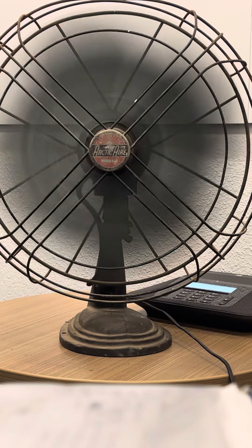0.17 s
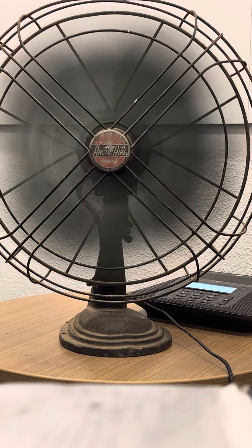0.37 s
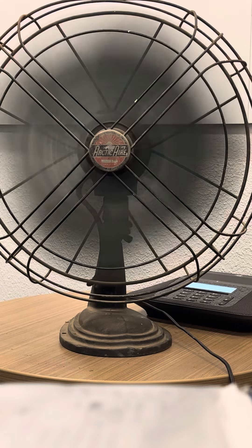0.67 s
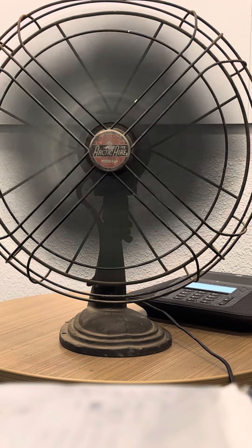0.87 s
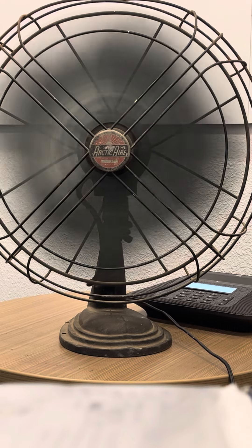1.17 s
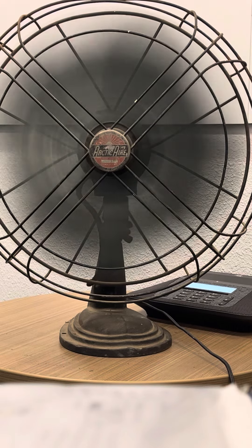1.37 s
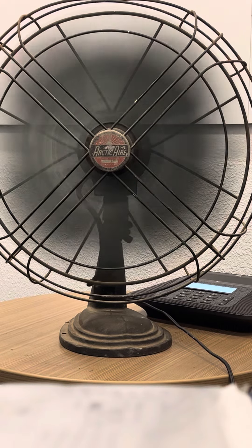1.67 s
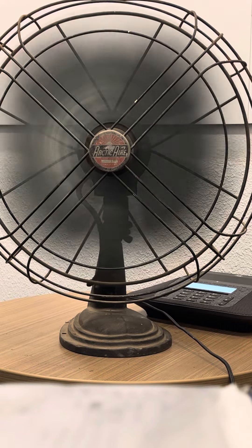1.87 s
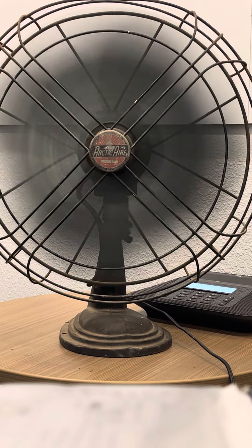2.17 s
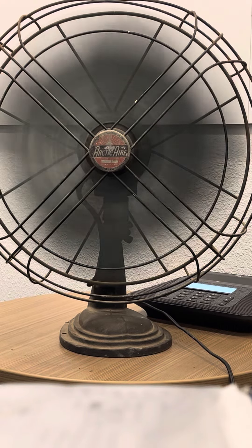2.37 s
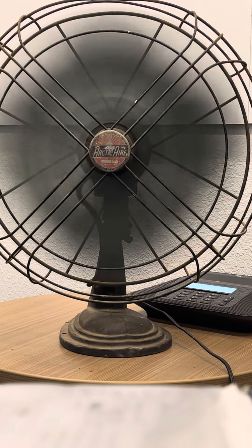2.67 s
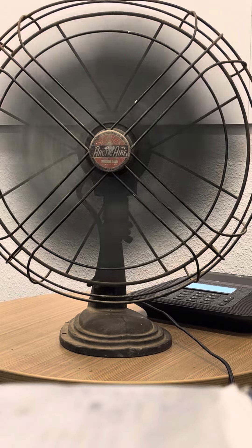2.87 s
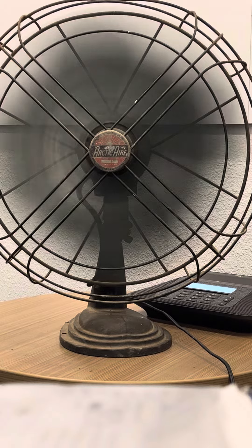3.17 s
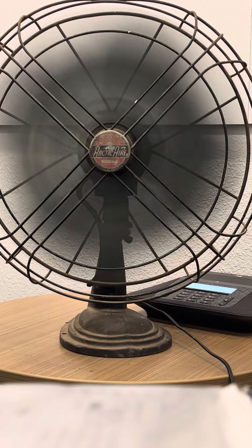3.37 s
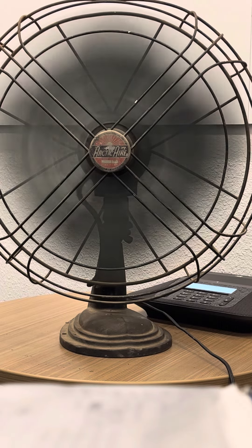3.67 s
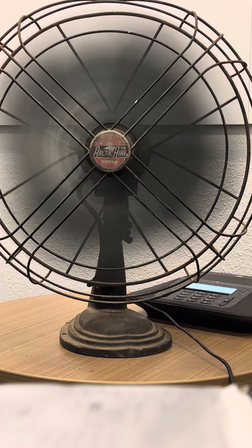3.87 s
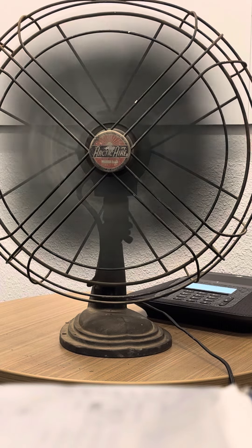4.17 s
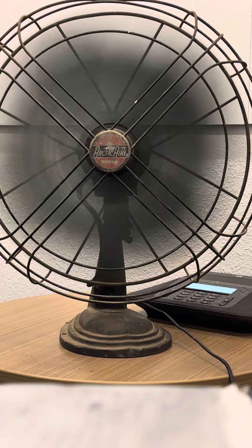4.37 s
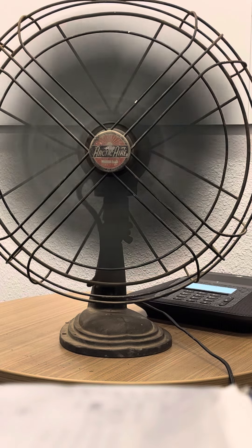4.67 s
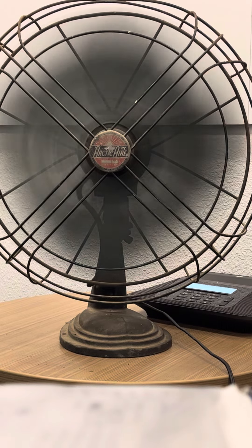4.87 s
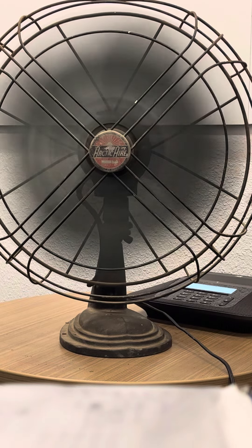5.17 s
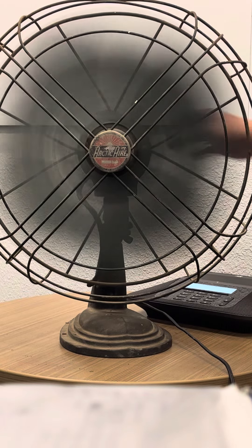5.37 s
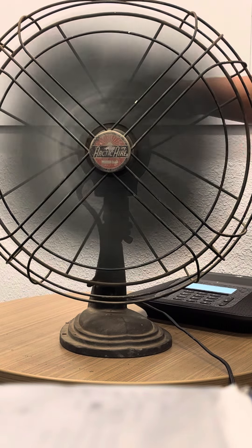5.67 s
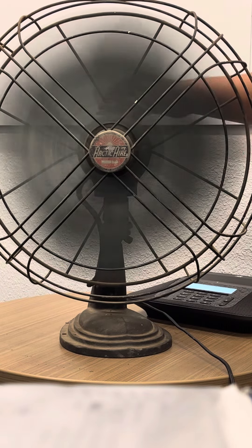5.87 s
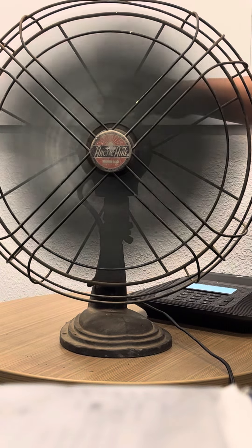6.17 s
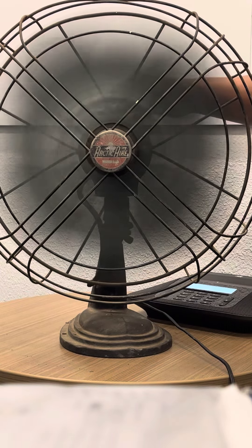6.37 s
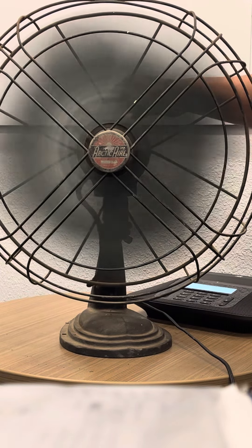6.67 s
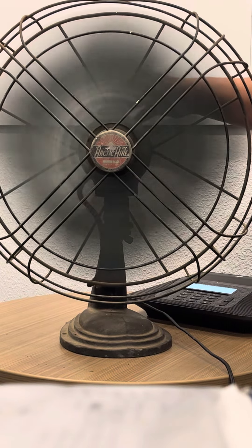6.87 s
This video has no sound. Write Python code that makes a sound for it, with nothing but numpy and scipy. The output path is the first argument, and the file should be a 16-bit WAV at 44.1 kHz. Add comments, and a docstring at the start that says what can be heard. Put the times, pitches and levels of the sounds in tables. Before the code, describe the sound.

Close wind buffeting from an old electric fan: bassy, lumpy gusts push against the microphone, irregular little flutters and dull pops crackle on top, and heavy thumps land now and then. A smooth, muted airy whoosh and weak low hum continue behind. A tiny dry tick passes past the middle, then pops crowd together before the steady turbulent blowing carries on. Small room, barely any echo.

```python
"""A desk fan blows straight at a nearby microphone in a small room: 7 s of even whoosh, hum and wind.
From the start, filtered noise makes blade whoosh and port rumble; small eddies flutter past in puffs.
Short pressure swings make pops from 0.4 s and thumps from 1.4 s, amid gusts and brief lulls.
A faint dry tick falls at 4.65 s; pops crowd between 5.4 and 5.7 s.
The turbulence and the whoosh grow slightly stronger towards the end."""
import sys
import numpy as np
from scipy import signal
from scipy.fft import rfft, irfft, next_fast_len
from scipy.io import wavfile
from scipy.ndimage import uniform_filter1d

SR = 44100
rng = np.random.default_rng(int(sys.argv[2]) if len(sys.argv) > 2 else 0)


def store_pcm(level_fs):
    """Save levels as 16-bit WAV."""
    pcm = np.round(np.clip(level_fs, -1, 1) * 32767).astype(np.int16)
    wavfile.write(sys.argv[1], SR, np.atleast_2d(pcm).T)


N = 309582
TIME = np.arange(N) / SR


def from_db(db):
    """Decibels to gain."""
    return 10 ** (np.asarray(db) / 20)


def rms_one(x):
    """Scale to rms 1."""
    return x / np.sqrt(np.mean(x ** 2) + 1e-20)


def in_time(points):
    """Interpolate a (start_s, value) table at every sample."""
    start_s, values = np.transpose(points)
    return np.interp(TIME, start_s, values)


def at_hz(points, hz):
    """Read a (frequency_hz, value) table on a log-frequency axis."""
    known_hz, values = np.transpose(points)
    return np.interp(np.log(np.maximum(hz, 1)), np.log(known_hz), values)


def filtered(x, response):
    """Pass x through a frequency response, given as a function of Hz."""
    size = next_fast_len(N + SR // 2)
    hz = np.arange(size // 2 + 1) * SR / size
    return irfft(rfft(x, size) * response(hz), size)[:N]


def noise(spectrum):
    """Gaussian noise with the given dB per Hz."""
    white = rng.standard_normal(N) * np.sqrt(SR / 2)   # 0 dB per Hz
    return filtered(white, lambda hz: from_db(at_hz(spectrum, hz)))


def drift(rate_hz):
    """Smooth random curve that changes about rate_hz times a second; rms 1."""
    return rms_one(filtered(rng.standard_normal(N), lambda hz: 1 / (1 + (hz / rate_hz) ** 2)))


def lumps(rate_hz):
    """Quick, bounded random swings of the flow without slow wander; rms 1."""
    swings = filtered(rng.standard_normal(N), lambda hz: hz / (rate_hz ** 2 + hz ** 2) / (rate_hz + hz))
    return rms_one(np.tanh(rms_one(swings)))


def evened(x, span_s):
    """Hold the rms near 1 over a short span and keep the faster detail."""
    width = max(int(span_s * SR), 2)
    power = uniform_filter1d(uniform_filter1d(x ** 2, width), width)
    return x / np.sqrt(np.abs(power) + 1e-4 * np.mean(x ** 2))


def swells(rows):
    """Envelope of bells (centre_s, level_db, width_s); overlapping powers add, width is sigma of power."""
    power = np.zeros(N)
    for centre_s, level_db, width_s in rows:
        first = max(int((centre_s - 6 * width_s) * SR), 0)
        last = max(int((centre_s + 6 * width_s) * SR), 0)
        near = slice(first, last)
        power[near] += from_db(level_db) ** 2 * np.exp(-.5 * ((TIME[near] - centre_s) / width_s) ** 2)
    return np.sqrt(power)


# rumble of the port: frequency_hz, density_db_per_hz (shape only: rms is evened)
RUMBLE_SPECTRUM = [(12, -48), (22, -26.5), (35, -12), (48, 2), (60, -0.5), (85, 0.5), (115, -9.5),
                   (160, -12.5), (230, -28.5), (400, -36), (900, -92)]


def rumble(level_db, gust_db, lumpy_db, lumps_per_s, span_s):
    """The largest eddies merge into a lumpy roll that follows push and lulls and heaves in each gust."""
    steady = from_db(push_db() + lulls_db() + level_db + lumpy_db * lumps(lumps_per_s))
    heaves = from_db(gust_db) * gusts(level_column=1)
    return np.hypot(steady, heaves) * evened(noise(RUMBLE_SPECTRUM), span_s)


# steady push of the air stream on the port: start_s, rumble_db
PUSH_CURVE = [(0, -27.5), (0.85, -27), (0.93, -33), (1.08, -29), (1.27, -28), (1.35, -37), (1.45, -26),
              (2.1, -24), (2.38, -28.5), (2.55, -27.5), (3.75, -26.5), (3.87, -35), (4.0, -26.5),
              (4.45, -24), (4.57, -31), (4.9, -23), (5.13, -25.5), (5.2, -30.5), (5.28, -24.5), (5.75, -25),
              (6.14, -33), (6.22, -27.5), (7.02, -27)]


def push_db():
    """Push of the air stream, with its longer slack spells, as rumble level in dB."""
    return in_time(PUSH_CURVE)


def push_swing_db():
    """How far the push is above its mean dB."""
    push = push_db()
    return push - push.mean()


# brief changes of the push, nearly all drops: centre_s, change_db
BRIEF_LULLS = [(0.35, -13.5), (0.62, -2), (0.69, -20), (2.19, -6.5), (2.39, -3), (2.89, -13), (2.97, -2),
               (3.26, -6), (3.70, -6), (3.82, -4), (4.1, -7.5), (4.15, -3), (4.42, -6), (5.35, -13),
               (5.55, 1.5), (6.13, -6), (6.52, -3), (6.665, -7)]
LULL_WIDTH_S = 0.015


def lulls_db():
    """Bell-shaped brief lulls of the air stream, as a change in dB."""
    return sum(change_db * np.exp(-.5 * ((TIME - centre_s) / LULL_WIDTH_S) ** 2)
               for centre_s, change_db in BRIEF_LULLS)


# strong gusts, before gust_db: centre_s, rumble_db, turbulence_db
STRONG_GUSTS = [(0.134, -24, -51), (0.184, -21, -44), (0.452, -21.5, -35.5), (0.731, -23, -52),
                (0.807, -24, -31.5), (1.393, -30, -25.5), (1.486, -19, -28), (1.615, -19, -31),
                (1.7, -27, -23), (1.864, -26.5, -42), (2.467, -37, -19), (2.713, -18.5, -32),
                (2.771, -18, -59), (2.844, -20, -41), (3.007, -26, -24.5), (3.034, -17.5, -24),
                (3.217, -12.5, -21), (3.468, -22, -43), (3.612, -20, -29), (3.778, -24, -19.5),
                (3.994, -24, -27.5), (4.186, -27, -35), (4.265, -40, -29), (4.472, -20, -40),
                (4.627, -19.5, -24), (4.787, -19.5, -21), (4.907, -26, -25), (4.995, -21, -22),
                (5.262, -30, -23), (5.397, -20, -34), (5.606, -28, -21), (5.634, -23, -45),
                (5.762, -21, -34), (5.866, -17, -23.5), (6.032, -21, -24.5), (6.072, -18, -27),
                (6.199, -24, -43), (6.305, -17.5, -52), (6.408, -19, -26), (6.618, -18, -44),
                (6.773, -44, -23)]
GUST_WIDTH_S = 0.011


def gusts(level_column):
    """Envelope of the strong gusts; column 1 drives rumble, column 2 turbulence."""
    return swells([(row[0], row[level_column], GUST_WIDTH_S) for row in STRONG_GUSTS])


TURBULENCE_DB, TURBULENCE_RISE_DB_PER_S = -35, 0.5   # level at mean push, mid-scene
TURBULENCE_FOLLOWS = 0.35   # dB per dB of push swing


def stir(gust_db, lumpy_db, lumps_per_s):
    """Turbulence strength follows the push, varies by chance, slowly rises and flares in each gust."""
    trend_db = TURBULENCE_DB + TURBULENCE_FOLLOWS * (push_swing_db() + lulls_db())
    trend_db = trend_db + TURBULENCE_RISE_DB_PER_S * (TIME - TIME.mean())
    steady = from_db(trend_db + lumpy_db * lumps(lumps_per_s))
    return np.hypot(steady, from_db(gust_db) * gusts(level_column=2))


def eddy_shape(hz, pitch_hz):
    """Spectrum of a passing eddy: a smooth pressure swing between two smaller opposite ones."""
    ratio = (hz / pitch_hz) ** 2
    return ratio * np.exp(-ratio)


# sizes of the passing eddies: pitch_hz, turbulence_gain_db, puff_gain_db
EDDY_SIZES = [(171.4, -5.5, -14.5), (269.4, -14, -4), (424, -24, -1), (603.6, -24, 0.5),
              (937, -35.5, -12.5), (1330, -49.5, -33)]
PUFF_MIDDLE_HZ = 667   # the tilt of a puff turns about this pitch


def flutter(turbulence, puffs, eddies_per_cycle, span_cycles, ripple_db, ripple_hz, ripple_span_s):
    """Coarse eddies pass all the time, small ones mostly in crackling puffs; smaller ones more often."""
    out = np.zeros(N)
    crackle = evened(from_db(ripple_db * drift(ripple_hz)), ripple_span_s)
    for pitch_hz, turbulence_gain_db, puff_gain_db in EDDY_SIZES:
        octaves = max(np.log2(pitch_hz / PUFF_MIDDLE_HZ), -1)   # limits the bass of a dull puff
        tilted = [(s, db + tilt_db * octaves, width_s) for s, db, width_s, tilt_db in puffs]
        puffed = from_db(puff_gain_db) * crackle * swells(tilted)
        steady = from_db(turbulence_gain_db) * turbulence
        arrives = rng.random(N) < eddies_per_cycle * pitch_hz / SR
        swings = filtered(arrives * rng.standard_normal(N), lambda hz: eddy_shape(hz, pitch_hz))
        out += np.hypot(steady, puffed) * evened(swings, span_cycles / pitch_hz)
    return out


# strongest puffs, before eddy gains: centre_s, level_db, width_s, tilt_db_per_octave
STRONG_PUFFS = [(0.019, -37.5, 0.0099, -3.5), (0.081, -32.5, 0.0022, -9), (0.151, -31.5, 0.0023, 1),
                (0.18, -31, 0.0016, -2), (0.232, -37.5, 0.0084, 1.5), (0.295, -32, 0.0072, 6),
                (0.38, -34, 0.0045, 0), (0.403, -28.5, 0.0029, 13), (0.46, -33.5, 0.0078, 5),
                (0.577, -38.5, 0.0036, 1), (0.629, -34, 0.0029, 4), (0.68, -35.5, 0.0043, 5),
                (0.739, -33, 0.0019, 12), (0.762, -38, 0.0071, 3), (0.792, -21, 0.0011, 11.5),
                (0.836, -37, 0.0068, -9), (1.022, -32, 0.0053, 9), (1.04, -38, 0.0046, -9),
                (1.065, -32.5, 0.0022, 18), (1.109, -31.5, 0.0024, 8), (1.125, -32.5, 0.0029, -11.5),
                (1.211, -35, 0.01, 1), (1.383, -34, 0.0038, 3), (1.455, -20, 0.0019, 11),
                (1.473, -38.5, 0.0031, 0), (1.489, -28.5, 0.0019, 11), (1.608, -40, 0.008, -13),
                (1.631, -30, 0.0024, -2), (1.663, -31, 0.0014, -5.5), (1.777, -45, 0.0111, -18.5),
                (1.825, -40, 0.0051, -8), (1.855, -31, 0.0019, 3), (1.909, -29.5, 0.0025, 15),
                (1.94, -31, 0.0017, 3), (2.148, -28.5, 0.0019, -8.5), (2.25, -40, 0.0048, -6.0),
                (2.418, -40.5, 0.002, -13), (2.467, -37, 0.0016, -4), (2.531, -34.5, 0.002, 5),
                (2.607, -38, 0.0063, 0), (2.96, -29, 0.0026, 6), (2.997, -26.5, 0.0025, 17),
                (3.194, -30.5, 0.0011, -16), (3.217, -33, 0.0033, -5), (3.568, -37.5, 0.0055, -8.5),
                (3.701, -32, 0.0027, 1.5), (3.734, -31, 0.0022, 0), (3.806, -34, 0.0013, -3.0),
                (3.925, -39, 0.0036, -3), (3.985, -42, 0.006, -4), (4.081, -40.0, 0.0062, -10.5),
                (4.121, -34.5, 0.0078, -6), (4.305, -32.5, 0.0041, 3), (4.458, -34, 0.0026, -10.5),
                (4.489, -33.0, 0.0029, 0.0), (4.506, -35.5, 0.003, -13), (4.613, -29.5, 0.0031, 13),
                (4.638, -31.0, 0.0031, -4), (4.673, -41, 0.0055, -15), (4.704, -35.5, 0.0081, -7),
                (4.77, -33, 0.0016, -5), (4.837, -29, 0.0022, 12), (4.852, -34, 0.0028, -9.5),
                (4.884, -36, 0.0013, -6), (4.934, -33, 0.0039, -3.5), (4.959, -28, 0.0021, 8),
                (4.985, -36.5, 0.0015, -7), (5.029, -38, 0.0094, -12.5), (5.065, -30, 0.0059, -0.5),
                (5.282, -29.5, 0.0015, 9), (5.343, -38.5, 0.0037, -8), (5.401, -26, 0.0025, -4),
                (5.448, -32.5, 0.0029, -5), (5.496, -33, 0.0012, -8.0), (5.557, -36, 0.0083, -4),
                (5.574, -24, 0.0057, 17), (5.654, -36, 0.0084, -7), (5.692, -37.0, 0.0018, -11.5),
                (5.706, -30, 0.0026, -12.5), (5.737, -34.0, 0.0016, -3.5), (5.811, -36, 0.0111, -4),
                (5.857, -25.5, 0.0025, -7), (6.0, -35.5, 0.0024, -11), (6.029, -19.5, 0.00076, 11),
                (6.067, -30.5, 0.0033, 10.0), (6.145, -38.5, 0.0043, -8.5), (6.259, -30.5, 0.0031, 12.5),
                (6.38, -37, 0.0034, -3.5), (6.434, -36.5, 0.0026, -4), (6.45, -33, 0.003, -3),
                (6.535, -28, 0.0024, 7), (6.648, -31.5, 0.0022, 2), (6.671, -31.5, 0.0032, 12),
                (6.774, -32.5, 0.0015, -9.5), (6.89, -33, 0.002, 14), (6.907, -33, 0.0043, -8),
                (7.003, -35, 0.0051, 1)]
PUFFS_PER_S, PUFF_JITTER_S = 26, 0.0151
WEAK_PUFF_DB, WEAK_PUFF_RANGE_DB = -38.5, 4.5   # range: either way
PUFF_FOLLOWS = 0.56   # dB per dB of push swing
WEAK_PUFF_WIDTH_S, WEAK_PUFF_TILT_DB_PER_OCTAVE = 0.0013, 5.5   # tilt: largest either way


def all_puffs():
    """Strong puffs plus weak ones at loose intervals, random in strength and tilt, growing with push."""
    late, strength, brightness = rng.uniform(-1, 1, size=(400, 3)).T
    centre_s = np.arange(len(late)) / PUFFS_PER_S + PUFF_JITTER_S * late
    level_db = WEAK_PUFF_DB + WEAK_PUFF_RANGE_DB * strength
    level_db = level_db + PUFF_FOLLOWS * np.interp(centre_s, TIME, push_swing_db())
    width_s = np.full(len(centre_s), WEAK_PUFF_WIDTH_S)
    weak = zip(centre_s, level_db, width_s, WEAK_PUFF_TILT_DB_PER_OCTAVE * brightness)
    return list(STRONG_PUFFS) + list(weak)


# strong small eddies that hit the port, before the level in scene(): centre_s, level_db, pitch_hz
POP_EDDIES = [(0.3854, -18.5, 755), (0.4035, -28, 850), (0.4578, -23, 755), (0.6262, -21.8, 740),
              (0.7942, -13, 810), (0.8308, -23.5, 755), (0.8389, -22, 870), (1.1075, -24, 710),
              (1.4546, -26, 1120), (1.6095, -28, 740), (1.8766, -19.5, 636), (2.1475, -15, 816),
              (2.5305, -31, 900), (2.6898, -21.5, 755), (2.9957, -19, 1030), (3.6356, -21, 660),
              (4.1845, -18.5, 656), (4.2485, -22.5, 1250), (4.6968, -16, 920), (4.719, -19.5, 804),
              (4.9585, -24, 900), (5.0338, -22, 1270), (5.0345, -20, 644), (5.0581, -28.5, 740),
              (5.2805, -23, 800), (5.3913, -19.5, 580), (5.3985, -17, 940), (5.5666, -26, 699),
              (5.5734, -15.5, 766), (5.5928, -16.5, 690), (5.6026, -19.5, 807), (5.6053, -19.5, 816),
              (5.708, -28.5, 734), (5.8524, -28, 816), (5.8565, -23.5, 970), (6.068, -17, 740),
              (6.1463, -20, 1296), (6.2579, -18.5, 1010), (6.5215, -23, 880), (6.5332, -20.5, 600),
              (6.5964, -20, 900), (6.67, -20.5, 680)]
# strong large eddies, same columns: centre_s, level_db, pitch_hz
THUMP_EDDIES = [(1.4357, -10, 79), (2.5505, -10, 72), (3.2222, -14, 72), (4.7892, -7.5, 135),
                (4.9496, -9, 73), (5.1002, -13.5, 72), (5.6069, -9, 121), (5.6488, -12.5, 96.5)]


def single_eddies(rows, cycles, fall):
    """Each strong eddy is a short pressure swing that starts steep and slackens, so its pitch falls."""
    out = np.zeros(N)
    phases_rad = rng.uniform(0, 2 * np.pi, len(rows))
    for (centre_s, level_db, pitch_hz), phase_rad in zip(rows, phases_rad):
        near = slice(max(int((centre_s - 2 / pitch_hz) * SR), 0), int((centre_s + 10 / pitch_hz) * SR))
        stretch = 1 + fall * (TIME[near] - centre_s) * pitch_hz
        turns = np.log(np.maximum(stretch, 1e-6)) / fall
        bell = np.exp(-.5 * (turns / cycles) ** 2)
        out[near] += from_db(level_db) * bell * np.cos(2 * np.pi * turns + phase_rad)
    return out


def swirl(turbulence, level_db, centre_hz, width_hz):
    """A narrow band of the turbulence pushes the two channels in opposite directions."""
    band = filtered(rng.standard_normal(N), lambda hz: np.exp(-((hz - centre_hz) / width_hz) ** 2))
    return from_db(level_db) * turbulence * rms_one(band) * np.array([[1], [-1]])


# air torn by the blades and the wire guard: frequency_hz, density_db_per_hz
WHOOSH_SPECTRUM = [(40, -70), (250, -72.5), (500, -74), (750, -80), (1020, -76.5), (1400, -81), (2100, -80),
                   (2900, -85.5), (3800, -94.5), (5100, -98.5), (6500, -101), (9000, -105.3), (13500, -113),
                   (15700, -119)]
# slow swell of the whoosh: start_s, gain_db
WHOOSH_SWELL = [(0, -1), (1.5, 0.2), (3, 0.5), (4.2, 1), (5, 1.2), (6, 1.5), (7.02, 1.5)]


def whoosh(chop, flicker_db, flicker_hz):
    """Torn air makes shaped noise with a light level flicker, slightly chopped by the passing blades."""
    level = from_db(in_time(WHOOSH_SWELL) + flicker_db * drift(flicker_hz))
    blade_pass = np.sin(2 * np.pi * HUM_TONES[0][0] * TIME)
    return level * noise(WHOOSH_SPECTRUM) * (1 + chop * blade_pass)


def wide_hiss(level_db, low_hz):
    """Part of the high whoosh has no direction: extra noise, opposite in the two channels."""
    hiss = filtered(noise(WHOOSH_SPECTRUM), lambda hz: hz ** 2 / (hz ** 2 + low_hz ** 2))
    return from_db(level_db) * hiss * np.array([[1], [-1]])


# faint hum of the motor and blades: frequency_hz, rms_db
HUM_TONES = [(59.2, -36), (260, -50), (349, -54)]


def hum(waver_rad, waver_hz):
    """Motor and blades hum in sines whose phases waver independently."""
    out = np.zeros(N)
    for frequency_hz, rms_db in HUM_TONES:
        phase_rad = 2 * np.pi * frequency_hz * TIME + waver_rad * drift(waver_hz)
        out += from_db(rms_db) * np.sqrt(2) * np.sin(phase_rad)
    return out


# fan sound that comes back from the walls: frequency_hz, gain_db against the direct sound
ROOM_COLOUR = [(120, -63.5), (400, -19.5), (850, -1), (1100, -7), (1500, -6), (2300, -12), (4000, -45),
               (13000, -49.5)]
ROOM_T60_S = 0.05


def room(x):
    """The walls send back a short diffuse tail, a different one to each channel."""
    age_s = TIME[:SR // 2]
    tails = rng.standard_normal((2, len(age_s))) * from_db(-60 * age_s / ROOM_T60_S)
    tails = tails / np.linalg.norm(tails, axis=1, keepdims=True)
    coloured = filtered(x, lambda hz: from_db(at_hz(ROOM_COLOUR, hz)))
    return np.array([signal.fftconvolve(coloured, tail)[:N] for tail in tails])


# quick contacts of one tiny dry tick: start_s, nominal_peak_db
TICK_CONTACTS = [(4.6472, -42), (4.6476, -42), (4.6485, -46), (4.6511, -41)]
TICK_TAIL_DB, TICK_T60_S = -19, 0.014


def ticks():
    """A few quick contacts make band-passed impulses with a very short rough tail and no ring."""
    clicks = np.zeros(N)
    for start_s, peak_db in TICK_CONTACTS:
        clicks[round(start_s * SR)] = 2 * from_db(peak_db)   # the band-pass takes away part of the height
    age_s = TIME[:SR // 20]
    tail = rng.standard_normal(len(age_s)) * from_db(TICK_TAIL_DB - 60 * age_s / TICK_T60_S)
    clicks = clicks + signal.fftconvolve(clicks, tail)[:N]
    band = signal.butter(1, [3000, 9000], "band", fs=SR, output="sos")
    return signal.sosfilt(band, clicks + 1e-18)


# phase by which the left channel leads the right: frequency_hz, lead_rad
CHANNEL_LEAD = [(180, 0.0), (300, 0.07), (410, 1.7), (500, -0.47), (620, -0.83), (1000, -0.47),
                (1600, -0.39), (2000, 0.64), (2600, 2.22), (3800, 0.85), (5000, 1.24), (6000, 3.15),
                (10300, 9.41), (14200, 15.71)]


def stereo(x):
    """Both channels carry the same sound, shifted against each other in phase."""
    def shifted(side):
        return filtered(x, lambda hz: np.exp(.5j * side * at_hz(CHANNEL_LEAD, hz)))
    return np.array([shifted(1), shifted(-1)])


def scene():
    """The fan and its wind on the microphone."""
    turbulence = stir(gust_db=1.0, lumpy_db=6.0, lumps_per_s=15.0)
    wind = rumble(level_db=0.0, gust_db=-1.5, lumpy_db=3.0, lumps_per_s=12.6, span_s=0.03)
    wind = wind + flutter(turbulence, all_puffs(), eddies_per_cycle=0.8, span_cycles=3.2,
                          ripple_db=2.5, ripple_hz=82, ripple_span_s=0.0048)
    wind = wind + from_db(-1.2) * single_eddies(POP_EDDIES, cycles=0.74, fall=0.63)
    wind = wind + from_db(-3.0) * single_eddies(THUMP_EDDIES, cycles=0.75, fall=0.21)
    machine = whoosh(chop=.02, flicker_db=0.58, flicker_hz=18) + hum(waver_rad=0.56, waver_hz=3.2)
    width = swirl(turbulence, level_db=-21.0, centre_hz=467, width_hz=56)
    width = width + wide_hiss(level_db=-13.5, low_hz=1800)
    soft_ends = np.minimum(np.minimum(TIME, TIME[-1] - TIME) / .004, 1)   # 4 ms fades
    return stereo(soft_ends * (wind + machine)) + room(machine) + width + ticks()


LOW_CUT_HZ, CUTOFF_HZ = 29.3, 15700


def record(dry):
    """The microphone sheds the deepest rumble; the top is cut steeply."""
    lean = np.array([filtered(x, lambda hz: hz ** 4 / (hz ** 4 + LOW_CUT_HZ ** 4)) for x in dry])
    top_cut = signal.ellip(10, .1, 80, CUTOFF_HZ, fs=SR, output="sos")
    return signal.sosfilt(top_cut, lean)


dry = scene()
out = record(dry)
store_pcm(out)
```